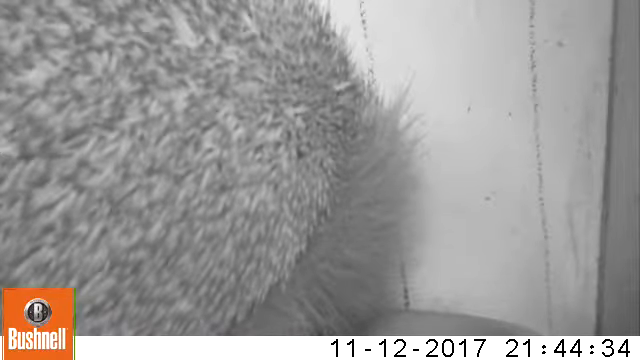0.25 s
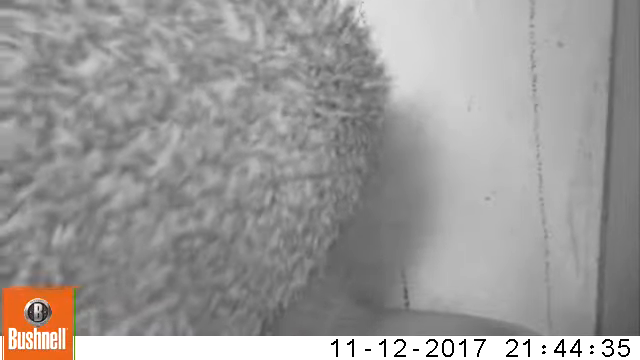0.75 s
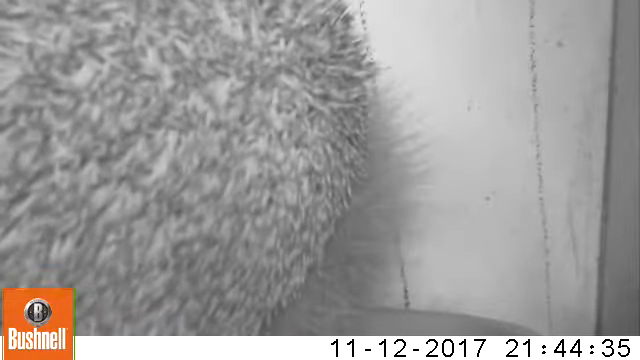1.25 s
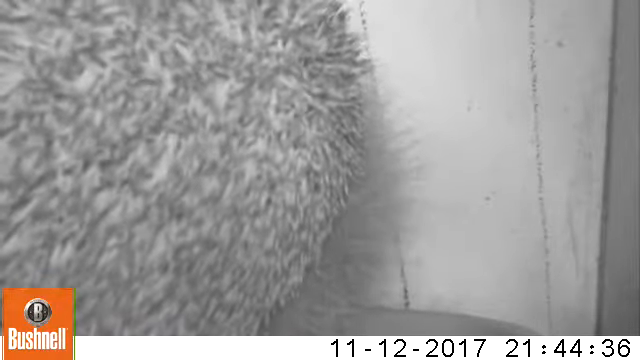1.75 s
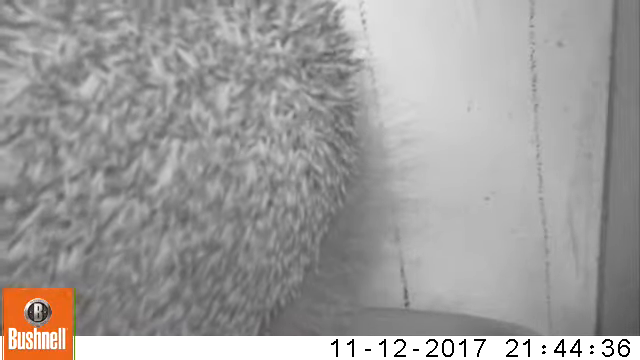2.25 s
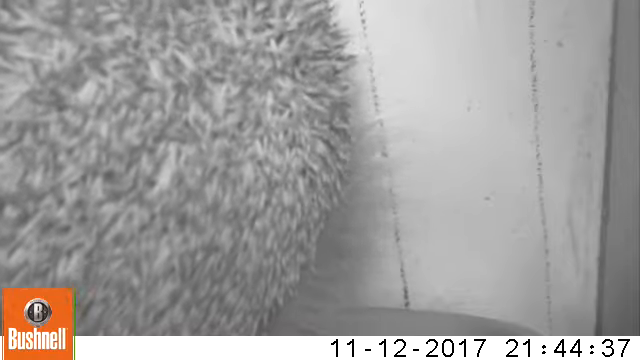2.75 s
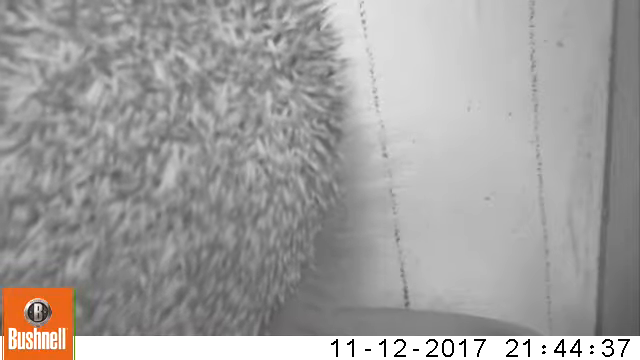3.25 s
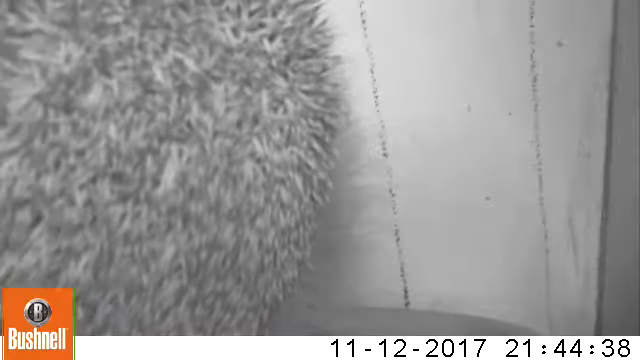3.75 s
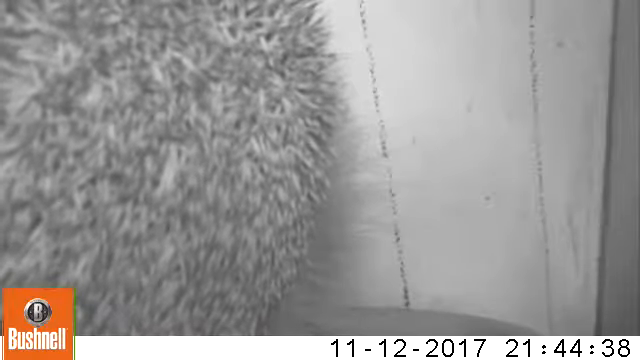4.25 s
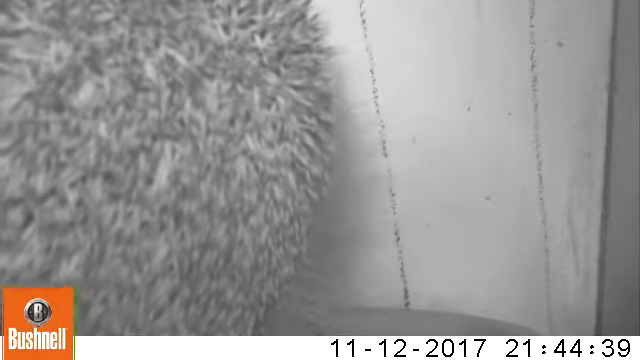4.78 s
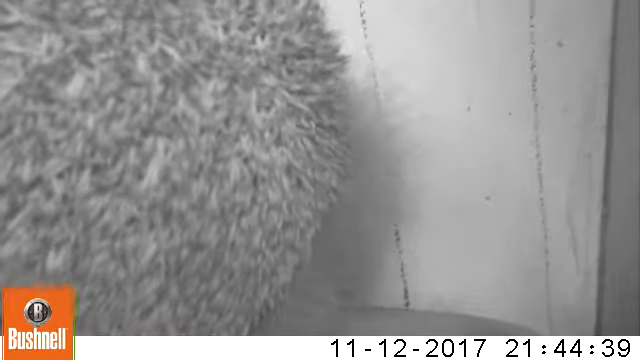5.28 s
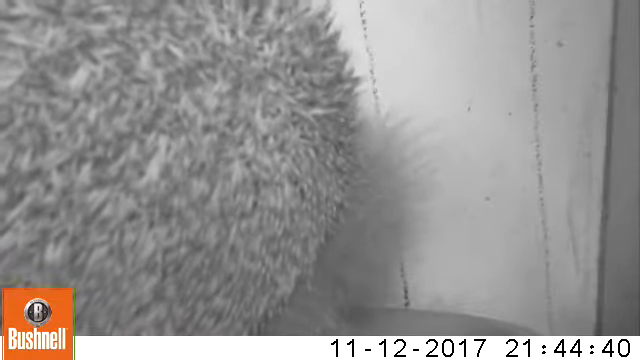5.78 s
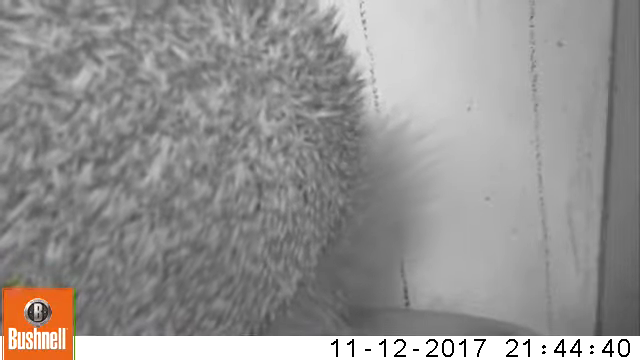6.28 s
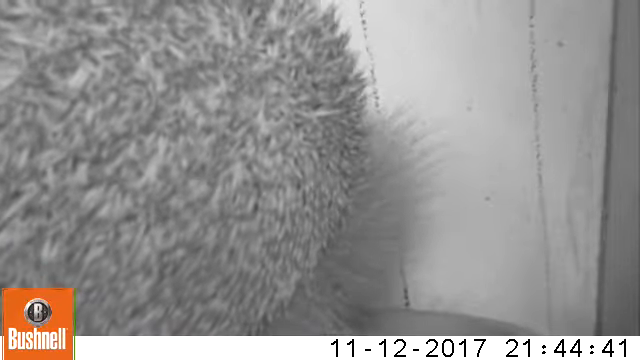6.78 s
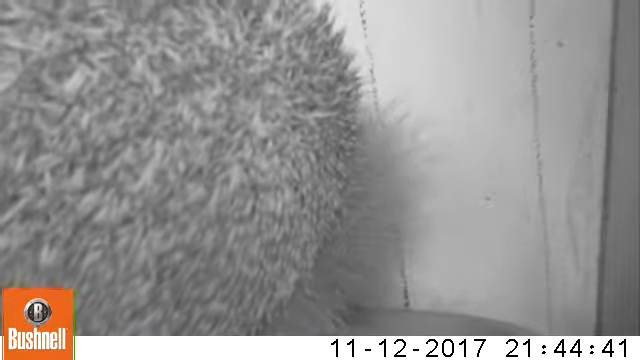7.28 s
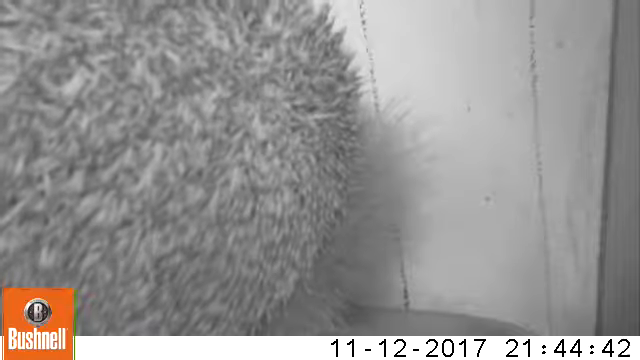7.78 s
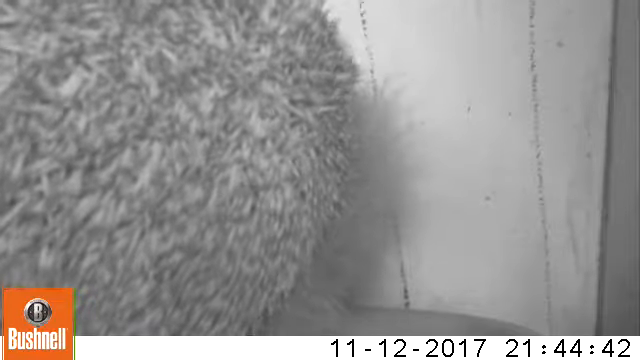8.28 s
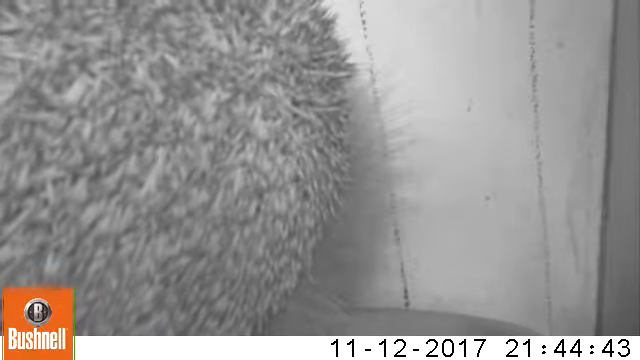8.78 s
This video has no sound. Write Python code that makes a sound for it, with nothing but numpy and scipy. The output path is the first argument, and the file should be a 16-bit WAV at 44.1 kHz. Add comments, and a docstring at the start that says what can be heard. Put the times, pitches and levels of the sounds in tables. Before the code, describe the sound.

Close to a small microphone inside a wooden box, a hedgehog shifts in dry bedding. After a brief wait with only low rumble and soft noise, irregular bouts of brittle crackles begin, bright and hard with hissy edges. Short pauses separate them. A soft bump touches the wall late on, then the crackles grow sparse and faint.

```python
"""A hedgehog in a wooden box crunches and stirs its dry bedding close to a small microphone.
A steady noise floor and a distant rumble that booms near 70 Hz run throughout; the rumble wavers in level.
From 0.6 s come bouts of crackles over faint stirring: each crackle is a short volley of tiny fractures
that rings the box's hard modes and hisses in the treble. One soft bump on a wall falls at 7.14 s,
and the bouts thin out towards the end."""
import sys
import numpy as np
from scipy import signal
from scipy.fft import rfft, irfft, next_fast_len
from scipy.io import wavfile
from scipy.ndimage import uniform_filter1d

SR = 44100
rng = np.random.default_rng(int(sys.argv[2]) if len(sys.argv) > 2 else 0)


def bounce(signal):
    """Save signal as a 16-bit WAV file at the path given by the first command-line argument."""
    frames = np.transpose(np.atleast_2d(signal))
    limited = np.clip(frames, -1, 1)
    pcm = np.round(limited * 32767).astype(np.int16)
    wavfile.write(sys.argv[1], SR, pcm)


N = 398223


def from_db(db):
    """Amplitude gain of a level in dB."""
    return 10 ** (np.asarray(db) / 20)


def rms_one(x):
    """Scale to rms 1."""
    return x / np.sqrt(np.mean(x ** 2) + 1e-20)


def slow_noise(shape, span_s):
    """White noise smoothed over span_s along time; rms 1."""
    return rms_one(uniform_filter1d(rng.standard_normal(shape), round(span_s * SR)))


def coloured(spectrum):
    """Steady noise shaped to a spectrum of (hz, db_per_hz) rows; rms 1."""
    size = next_fast_len(N)
    hz, db = np.transpose(spectrum)
    bin_hz = np.fft.rfftfreq(size, 1 / SR)
    gain = from_db(np.interp(np.log(bin_hz + 1), np.log(hz), db))
    return rms_one(irfft(rfft(rng.standard_normal(size)) * gain, size)[:N])


def resonate(drives, modes):
    """Parallel two-pole resonances of alternating sign, one drive each; scaled to unit noise gain."""
    probe = np.zeros(4096)
    probe[0] = 1
    out, impulse_response = 0, 0
    for k, (hz, width_hz, db) in enumerate(modes):
        radius = np.exp(-np.pi * width_hz / SR)
        gain = from_db(db) * (-1) ** k * (1 - radius ** 2)
        b = gain * np.array([1, 0, -1])
        a = [1, -2 * radius * np.cos(2 * np.pi * hz / SR), radius ** 2]
        out = out + signal.lfilter(b, a, drives[k] + 1e-18)
        impulse_response = impulse_response + signal.lfilter(b, a, probe)
    return out / np.sqrt(np.sum(impulse_response ** 2))


def rustle():
    """One train of fractures drives ringing, dry and hissing modes; stirring joins the ringing."""
    # clear crackles: start_s, ringing_db, ringing_centre_hz, ringing_narrowness_db_per_octave2,
    # dry_db, hiss_db, hiss_centre_hz, t60_s (before stretch); levels before scatter
    clear_crackles = [(0.613, -57.5, 3440.0, 25, -85, -71, 13000.0, 0.07),
                      (0.683, -55, 3880, 60, -70, -66, 10600, 0.11),
                      (0.7645, -64, 3570.0, 40, -75, -71, 13000.0, 0.13),
                      (0.7935, -61.5, 3540, 23, -71, -61.5, 11800, 0.06),
                      (0.8145, -59, 3300, 25, -77, -75, 11260.0, 0.095),
                      (0.88, -56, 3080.0, 25, -66, -71, 10370.0, 0.068),
                      (0.9067, -54.5, 3350, 25, -63, -61, 11960.0, 0.06),
                      (0.9235, -64, 3440.0, 40, -76, -62, 12500.0, 0.074),
                      (0.951, -50, 3700, 60, -69, -64, 11570.0, 0.06),
                      (1.0085, -65, 3840.0, 40, -71, -77, 13000.0, 0.06),
                      (1.031, -62, 3260.0, 25, -74, -69, 13000.0, 0.06),
                      (1.0445, -67, 3570.0, 25, -71, -60, 13000.0, 0.06),
                      (1.0575, -61, 3320.0, 25, -76, -71, 11900, 0.097),
                      (1.081, -54, 3080.0, 60, -78, -67, 12800.0, 0.051),
                      (1.1315, -70, 2710.0, 25, -84, -81, 12250.0, 0.06),
                      (1.2265, -67, 3840.0, 40, -80, -65, 12800.0, 0.06),
                      (1.288, -65, 3640.0, 40, -75, -63.5, 11690.0, 0.095),
                      (1.306, -59, 3320.0, 40, -71, -68, 11070.0, 0.083),
                      (1.326, -61.5, 3380.0, 28, -80, -74, 11230.0, 0.13),
                      (1.441, -64, 2810.0, 40, -87, -80, 10380.0, 0.045),
                      (1.5086, -59, 3320.0, 40, -80, -66, 11890.0, 0.052),
                      (1.5356, -72, 3990.0, 60, -78, -68, 11100.0, 0.06),
                      (1.561, -63, 2920.0, 40, -79, -75, 12280.0, 0.06),
                      (1.6265, -67, 3440.0, 40, -75, -67, 12110.0, 0.1),
                      (1.6565, -63.5, 3320.0, 40, -79, -71, 11560.0, 0.14),
                      (2.0945, -64.5, 3380.0, 40, -74, -62.5, 12010.0, 0.06),
                      (2.1955, -63, 3770.0, 40, -73, -64, 12640.0, 0.13),
                      (2.218, -57, 3280, 40, -71, -75, 11870.0, 0.042),
                      (2.2295, -56, 3380.0, 42, -73, -78, 12020.0, 0.071),
                      (2.2745, -59, 3640.0, 40, -80, -68, 11570.0, 0.067),
                      (2.296, -56, 4130.0, 15, -72, -60, 11800, 0.06),
                      (2.3465, -64, 3990.0, 40, -72, -75, 11560.0, 0.17),
                      (2.378, -58.5, 3380.0, 15, -69, -67, 10640.0, 0.07),
                      (2.4224, -68, 3700.0, 40, -69, -70, 11610.0, 0.071),
                      (2.4897, -57, 3260.0, 40, -66, -73, 11430.0, 0.041),
                      (2.5115, -70, 3700.0, 60, -78, -64, 11320.0, 0.081),
                      (2.5235, -58.5, 3260.0, 25, -71, -67, 11980.0, 0.094),
                      (2.606, -56.5, 3770.0, 15, -62.5, -59, 12000, 0.06),
                      (2.626, -62, 4060.0, 25, -69, -65, 10750.0, 0.13),
                      (2.666, -54, 3320.0, 60, -80, -77, 10670.0, 0.067),
                      (2.7095, -63, 3260.0, 40, -72, -75, 10440.0, 0.06),
                      (3.023, -66, 4060.0, 40, -64, -49, 12900, 0.056),
                      (3.042, -60, 3640.0, 60, -72, -64, 11400.0, 0.092),
                      (3.071, -69, 3080.0, 25, -78, -60, 11160.0, 0.049),
                      (3.1655, -71, 3910.0, 40, -82, -64, 13000.0, 0.043),
                      (3.192, -61, 3910.0, 25, -72, -68, 11450.0, 0.053),
                      (3.1997, -52.5, 3840.0, 42, -67, -72, 10770.0, 0.054),
                      (3.276, -58, 3030.0, 25, -71, -47.5, 11800, 0.045),
                      (3.328, -61, 3570.0, 25, -65, -52, 12720.0, 0.11),
                      (3.411, -56, 3910.0, 13, -66, -57.5, 11500, 0.12),
                      (3.4705, -62, 3510.0, 25, -74, -74, 10650.0, 0.06),
                      (3.5305, -67, 3510.0, 25, -73, -67, 11960.0, 0.1),
                      (3.561, -47.5, 4800, 43, -67, -64, 10000, 0.065),
                      (3.5893, -56, 3440.0, 60, -69, -59, 11380.0, 0.06),
                      (3.602, -55, 3440.0, 60, -73, -63, 10970.0, 0.06),
                      (3.6147, -51.5, 3230, 40, -68, -65, 11930.0, 0.06),
                      (3.707, -59, 4290.0, 25, -68, -60, 13000.0, 0.071),
                      (3.7336, -50.5, 3260.0, 25, -69, -56, 12320.0, 0.048),
                      (3.7535, -62, 3440.0, 60, -75, -66, 10940.0, 0.073),
                      (3.8514, -57.5, 3080.0, 25, -74, -61, 12620.0, 0.043),
                      (3.884, -64, 3990.0, 15, -65, -63, 11800.0, 0.048),
                      (3.9135, -70, 3140.0, 25, -64, -64, 11440.0, 0.052),
                      (3.9268, -55, 3360, 25, -72, -73, 11140.0, 0.06),
                      (3.942, -63, 3700.0, 40, -68, -61, 9950.0, 0.039),
                      (4.001, -60.5, 4700.0, 25, -67, -84, 10510.0, 0.056),
                      (4.5705, -67, 3840.0, 25, -70, -59, 11200, 0.056),
                      (4.6345, -52, 3940, 29, -64, -63, 10380.0, 0.044),
                      (4.656, -45, 3500, 60, -69, -51, 11340.0, 0.057),
                      (4.7495, -59.5, 4450.0, 25, -77, -75, 10850.0, 0.06),
                      (4.764, -58, 4530.0, 17, -71, -67, 11620.0, 0.12),
                      (4.8475, -64, 3910.0, 25, -69, -70, 10360.0, 0.066),
                      (4.8995, -67, 3640.0, 60, -76, -66, 11750.0, 0.06),
                      (4.932, -56.5, 3840.0, 40, -80, -74, 11040.0, 0.06),
                      (4.95, -58, 3910.0, 40, -78, -74, 11000.0, 0.06),
                      (4.974, -64, 3640.0, 25, -80, -63, 13000.0, 0.06),
                      (4.9845, -60, 3570.0, 25, -76, -65, 11790.0, 0.17),
                      (5.0485, -66, 3200.0, 40, -75, -69, 10150.0, 0.077),
                      (5.0795, -62, 4060.0, 40, -68, -64, 13000.0, 0.081),
                      (5.1255, -58, 4610.0, 40, -69, -68, 11800.0, 0.042),
                      (5.1347, -50.5, 3360, 27, -66, -62, 10880.0, 0.064),
                      (5.1505, -59, 3910.0, 15, -62, -66, 10810.0, 0.054),
                      (5.2015, -60, 3770.0, 40, -79, -69, 11020.0, 0.06),
                      (5.2245, -65, 3910.0, 25, -75, -67, 13000.0, 0.18),
                      (5.2697, -61, 3510.0, 40, -77, -72, 10640.0, 0.06),
                      (5.31, -57, 3170, 23, -67, -56, 12800, 0.071),
                      (5.412, -51, 3660, 40, -61.5, -58.5, 13000.0, 0.064),
                      (5.425, -56, 3840.0, 60, -65, -63, 13000.0, 0.055),
                      (5.4418, -54, 3260.0, 38, -68, -71, 10910.0, 0.064),
                      (5.4546, -47, 3440.0, 180, -74, -67, 10540.0, 0.035),
                      (5.5285, -67, 3910.0, 25, -70, -58, 11710.0, 0.065),
                      (5.574, -58, 3060, 40, -86, -80, 10450.0, 0.066),
                      (5.631, -65.5, 3570.0, 90, -75, -79, 10220.0, 0.12),
                      (5.6632, -70, 3770.0, 60, -71, -59, 10790.0, 0.095),
                      (5.741, -65.5, 3570.0, 25, -75, -65.5, 10970.0, 0.06),
                      (5.7972, -62, 3440.0, 13, -77, -70, 11220.0, 0.13),
                      (5.8755, -64, 4130.0, 25, -69, -61, 11900, 0.065),
                      (5.9402, -50.5, 4530.0, 15, -63, -56, 11500, 0.072),
                      (6.0335, -67.5, 3990.0, 25, -79, -68, 11100.0, 0.096),
                      (6.0725, -60, 2870.0, 25, -83, -83, 10490.0, 0.071),
                      (6.1875, -66, 3200.0, 25, -72, -60, 12820.0, 0.053),
                      (6.246, -59, 3260.0, 40, -68, -74, 10880.0, 0.074),
                      (6.332, -69, 3510.0, 40, -86, -62, 12000.0, 0.053),
                      (6.3515, -76, 3440.0, 25, -84, -64, 11540.0, 0.06),
                      (6.3955, -61.5, 3990.0, 15, -78, -68, 10890.0, 0.075),
                      (6.462, -55.5, 3340, 20, -59, -57, 11980.0, 0.066),
                      (6.5855, -69, 3990.0, 60, -69, -73, 9000.0, 0.044),
                      (6.6125, -73, 3320.0, 40, -73, -70, 9000.0, 0.06),
                      (6.857, -61, 3440.0, 13, -70, -56, 11700, 0.079),
                      (6.904, -68, 3510.0, 40, -74, -61, 11500, 0.06),
                      (6.9265, -66, 3570.0, 25, -76, -66, 11600.0, 0.093),
                      (6.973, -50, 3100, 40, -68, -63.5, 11260.0, 0.077),
                      (7.0585, -54, 3260.0, 130, -85, -79, 12650.0, 0.04),
                      (7.087, -50.5, 3140.0, 90, -82, -80, 10800.0, 0.048),
                      (7.1145, -61, 3260.0, 130, -87, -85, 9950.0, 0.046),
                      (7.143, -52.5, 3180, 90, -77, -80, 10580.0, 0.045),
                      (7.1702, -57.5, 3300, 60, -78, -69, 10630.0, 0.06),
                      (7.179, -60, 3300, 23, -71, -61, 10500, 0.06),
                      (7.2436, -55.5, 3000, 40, -77, -76, 9540.0, 0.096),
                      (7.262, -74, 3770.0, 40, -79, -58.5, 10770.0, 0.06),
                      (7.319, -61, 3440.0, 60, -81, -69, 11300.0, 0.088),
                      (7.4208, -57.5, 3000, 25, -75, -70, 12800, 0.06),
                      (7.47, -58.5, 2710.0, 40, -85, -69, 11020.0, 0.067),
                      (7.674, -57, 3030, 42, -73, -77, 11730.0, 0.09),
                      (7.7596, -62.5, 3380.0, 60, -83, -66, 11010.0, 0.065),
                      (7.7945, -64, 2710.0, 40, -88, -80, 11190.0, 0.05),
                      (7.9325, -67.5, 2970.0, 60, -87, -84, 10880.0, 0.077),
                      (8.3035, -64.5, 2970.0, 40, -90, -85, 11510.0, 0.12),
                      (8.3495, -62.5, 2610.0, 40, -88, -83, 11110.0, 0.054),
                      (8.3685, -65, 3200.0, 89, -90, -83, 11680.0, 0.06),
                      (8.7495, -64, 3140.0, 60, -86, -82, 11590.0, 0.05),
                      (8.7855, -65, 2470.0, 25, -86, -82, 11140.0, 0.074),
                      (8.7967, -64, 2660.0, 40, -87, -75, 11890.0, 0.08),
                      (8.8175, -62, 2900, 40, -81, -64.5, 11600, 0.06),
                      (8.8895, -66, 3260.0, 60, -84, -74, 10540.0, 0.068)]
    # hard modes of the box and its contents: centre_hz, width_hz, level_db
    ring_modes = [(2000, 600, -5), (2450, 260, -5), (2870, 170, -7), (3130, 170, -7), (3580, 150, 0),
                  (3850, 500, -9), (4120, 130, 1), (4750, 300, -7)]
    # dry colour: centre_hz, width_hz, level_db
    dry_modes = [(5430, 1400, -0.5), (6360, 220, 3.5), (6500, 430, -1), (8380, 750, -19)]
    # treble hiss: centre_hz, width_hz, level_db
    hiss_modes = [(8270, 840, 0), (9380, 960, 6), (10550, 1130, 1), (11530, 590, 2.5), (12500, 660, 3.5),
                  (14000, 800, -1)]
    snaps = fractures(per_s=8000, uneven_db=3)
    bout_gain = moving()
    rows = np.vstack([faint_crackles(bout_gain), clear_crackles])
    ringing_db, ringing_hz, narrow_db, dry_db, hiss_db, hiss_hz = rows.T[1:7]
    ringing = strengths(ringing_db, ring_modes, 1.57, ringing_hz, narrow_db[:, None])
    dryness = strengths(dry_db, dry_modes, 0.5)
    hissing = strengths(hiss_db, hiss_modes, 1.7, hiss_hz, 79.0)
    ring_drives = volleys(rows, ringing, stretch=0.87) * snaps + stirring(bout_gain, len(ring_modes))
    dry_drives = volleys(rows, dryness, stretch=0.93) * snaps
    hiss_drives = volleys(rows, hissing, stretch=1.04) * snaps
    return (resonate(ring_drives, ring_modes) + resonate(dry_drives, dry_modes)
            + resonate(hiss_drives, hiss_modes))


def fractures(per_s, uneven_db):
    """Tiny snaps at random moments, of uneven size and sign; rms 1."""
    size_db = uneven_db * np.minimum(rng.exponential(1, N), 4)
    sizes = from_db(size_db) * rng.choice([-1, 1], N)
    return rms_one(sizes * (rng.random(N) < per_s / SR))


def volleys(rows, strength_db, stretch):
    """Envelopes of all crackles, one row per mode: linear swell, short hold, exponential decay."""
    swell_s, hold_s = .002, .00076
    out = np.zeros((strength_db.shape[1], N + SR))
    t = np.arange(SR // 6) / SR
    for start_s, t60_s, db in zip(rows[:, 0], rows[:, -1], strength_db):
        swell = np.clip(t / swell_s, 0, 1)
        decay_s = np.maximum(t - swell_s - hold_s, 0)
        shape = swell * from_db(-60 * decay_s / (max(t60_s, .01) * stretch))
        at = round(start_s * SR)
        out[:, at:at + len(t)] += np.outer(from_db(db), shape)
    return out[:, :N]


def strengths(level_db, modes, scatter_db, centre_hz=None, narrow_db=0):
    """Scattered level of each mode per crackle, falling with squared octaves from the centre."""
    db = level_db[:, None] + scatter_db * rng.standard_normal((len(level_db), len(modes)))
    if centre_hz is None:
        return db
    octaves = np.log2(np.transpose(modes)[0] / centre_hz[:, None])
    return db - narrow_db * octaves ** 2


def faint_crackles(bout_gain):
    """Small crackles at uneven spacing, levelled by the bout they fall in; rows like the clear ones."""
    # mean, spread; a row each for ringing_db, ringing_centre_hz, ringing_narrowness_db_per_octave2,
    # dry_db, hiss_db, hiss_centre_hz, t60_s (before stretch); levels relative to the stirring
    faint_spread = [(3.5, 2.8), (3398, 390), (37, 8), (-1.5, 3.8), (4.5, 4.3), (11600, 600),
                    (0.1063, 0.024)]
    mean_gap_s = .045
    slots_s = np.arange(0, N / SR - mean_gap_s, mean_gap_s)
    start_s = slots_s + mean_gap_s * rng.random(len(slots_s))
    mean, spread = np.transpose(faint_spread)
    bout_db = 20 * np.log10(bout_gain[(start_s * SR).astype(int)] + 1e-9)
    columns = mean + spread * rng.standard_normal((len(start_s), len(mean)))
    columns += np.outer(bout_db, [1, 0, 0, 1, 1, 0, 0])   # only the levels follow the bout
    return np.column_stack([start_s, columns])


def stirring(bout_gain, mode_count):
    """Faint, fitful fractures within the bouts; each mode's share wanders."""
    fitful_db = 3 * slow_noise(N, span_s=.008)
    stir = bout_gain * from_db(fitful_db) * fractures(per_s=2500, uneven_db=3)
    wander_db = 4.5 * slow_noise((mode_count, N), span_s=.04)
    return stir * from_db(wander_db)


def moving():
    """Gain of the stirring through the bouts of movement, with soft edges."""
    # bouts: start_s, end_s, stirring_db
    bouts = [(0.614, 1.74, -81.5), (2.108, 2.797, -81), (3.02, 4.107, -80), (4.544, 5.596, -82),
             (5.6, 6.67, -86), (6.828, 7.5, -86.5), (7.86, 7.977, -89), (8.274, 8.42, -96),
             (8.68, 8.92, -84.5)]
    edge_s = .04
    t = np.arange(N) / SR
    gain = 0
    for start_s, end_s, db in bouts:
        inside_s = np.minimum(t - start_s, end_s - t)
        gain = gain + from_db(db) * np.clip(inside_s / edge_s + .5, 0, 1)
    return gain


def knock():
    """A soft contact, building over two milliseconds, sets the wall's low modes ringing."""
    # bump on a wall: start_s, level_db
    bump = (7.1425, -49)
    # wall modes: pitch_hz, level_db (relative to the bump), t60_s
    wall_modes = [(480, -8, .05), (592, 0, .08), (690, -6, .05), (780, -5, .055), (910, -3, .065),
                  (1040, -11, .04)]
    start_s, bump_db = bump
    t = np.maximum(np.arange(N) / SR - start_s, 0)
    contact = 1 - np.exp(-t / .002)
    ringing = 0
    for k, (hz, db, t60_s) in enumerate(wall_modes):
        decay = from_db(bump_db + db - 60 * t / t60_s)
        ringing = ringing + decay * (-1) ** k * np.sin(2 * np.pi * hz * t)
    return contact * ringing


def rumble():
    """Low noise whose own quick swells are partly evened out, with a wavering level."""
    # wavering of the rumble, irregular: time_s, level_db
    rumble_wavering = [(0.0, -55), (0.02, -48), (0.75, -45.5), (0.85, -47.5), (2.54, -45.5), (3.32, -41),
                       (3.47, -44), (3.7, -36), (3.72, -42.5), (3.92, -38.5), (4.05, -45.5), (4.32, -45.5),
                       (4.4, -38.5), (4.42, -44.5), (4.75, -47.5), (4.78, -43), (6.69, -48.5),
                       (9.03, -44.5)]
    # spectrum, relative: frequency_hz, density_db_per_hz
    boom_spectrum = [(10, -28), (20, -4), (45, -4), (60, -5), (70, 4), (80, -2), (92, -7), (115, -19),
                     (170, -47), (400, -140)]
    evened = 0.17   # exponent: 0 keeps the swells, 1 flattens them
    x, span = coloured(boom_spectrum), round(.05 * SR)
    power = uniform_filter1d(uniform_filter1d(x ** 2, span), span)
    swells = np.sqrt(power + 1e-3)
    time_s, db = np.transpose(rumble_wavering)
    wavering_db = np.interp(np.arange(N) / SR, time_s, db)
    return from_db(wavering_db) * rms_one(x / swells ** evened)


def noise_floor():
    """Steady coloured noise, strongest in the bass."""
    # spectrum, relative: frequency_hz, density_db_per_hz
    floor_spectrum = [(65, -45), (110, -0.5), (155, -0.5), (253, -7), (297, -9.5), (503, -12), (568, -15.5),
                      (617, -14), (786, -20), (1730, -29), (4230, -34.5), (4590, -38), (14000, -41)]
    return from_db(-59.0) * coloured(floor_spectrum)


def scene():
    """Sum of all sources, one channel."""
    return (rustle() + knock() + rumble() + noise_floor())[None]


def record(dry):
    """A steep elliptic low-pass cuts the top."""
    cutoff_hz, ripple_db, stop_db = 14200, .5, 60
    sos = signal.ellip(12, ripple_db, stop_db, cutoff_hz, fs=SR, output="sos")
    return signal.sosfilt(sos, dry)


dry = scene()
out = record(dry)
bounce(out)
```